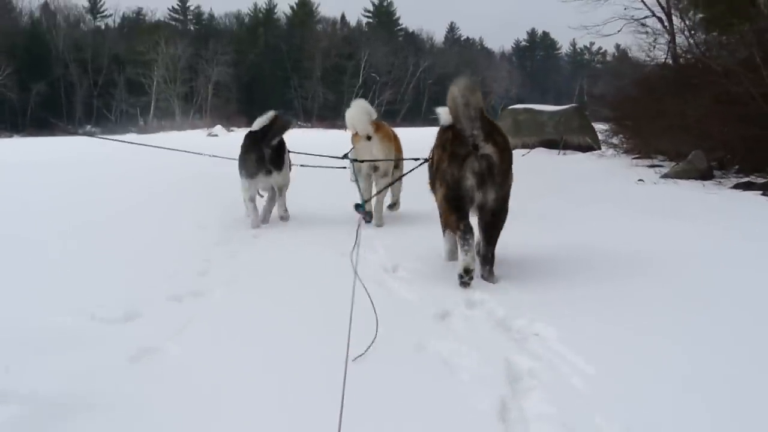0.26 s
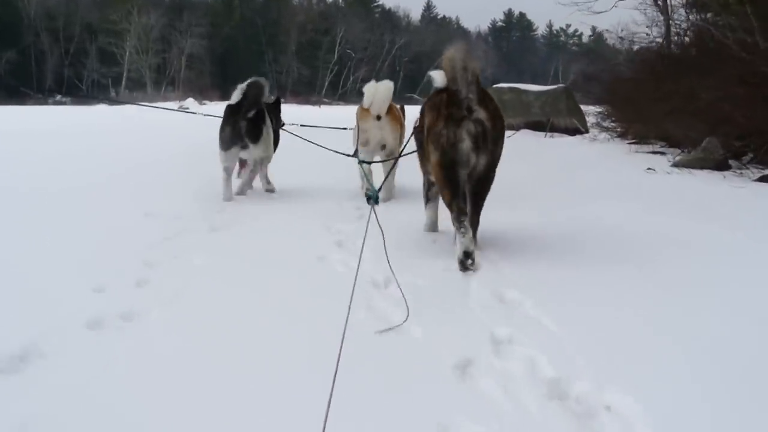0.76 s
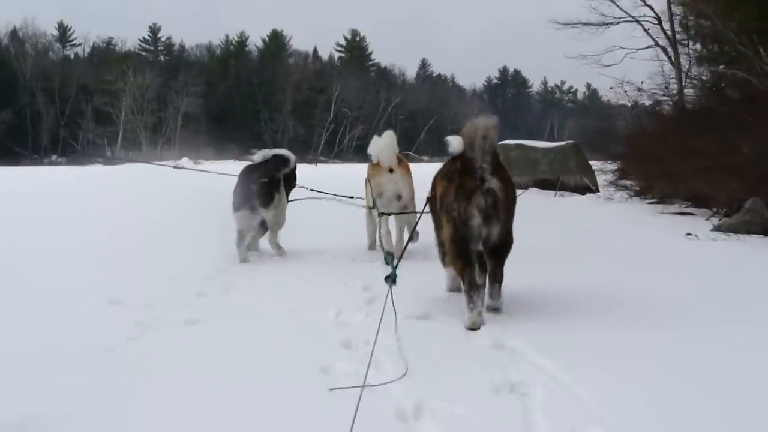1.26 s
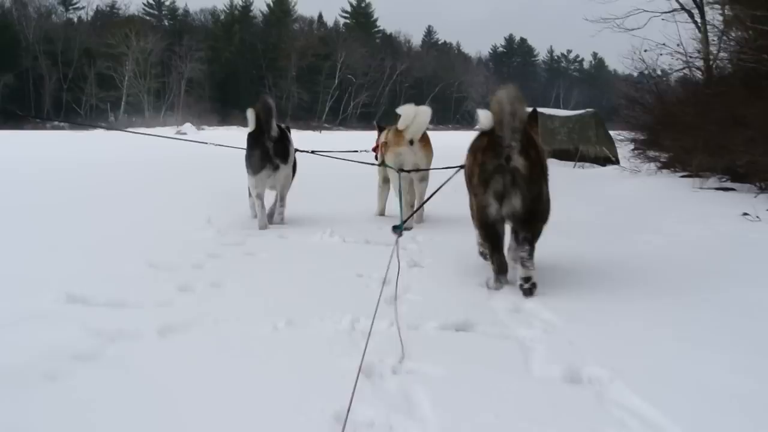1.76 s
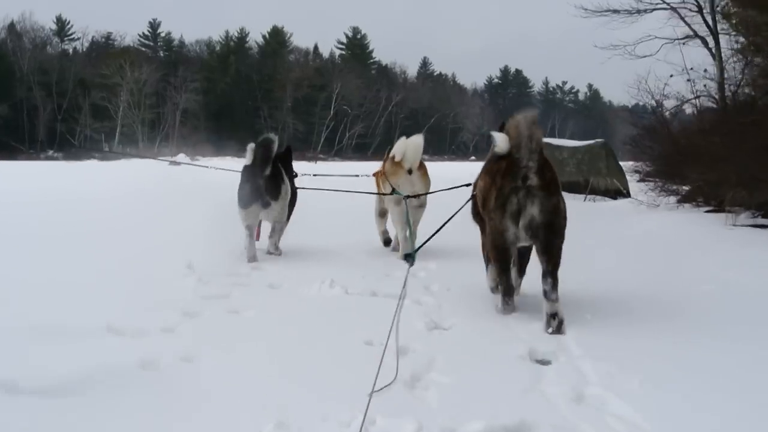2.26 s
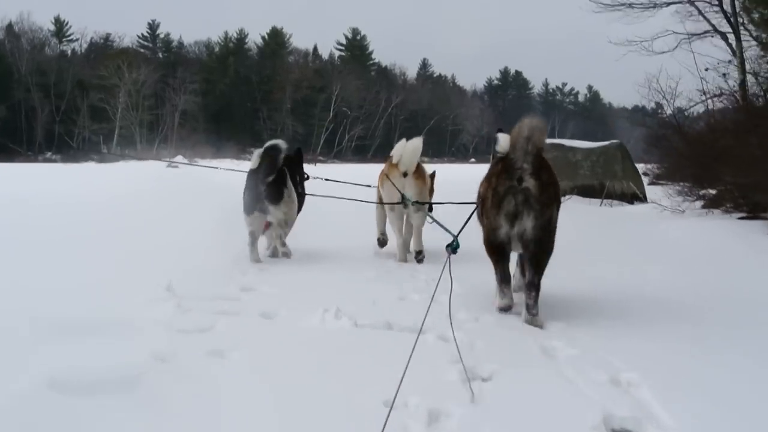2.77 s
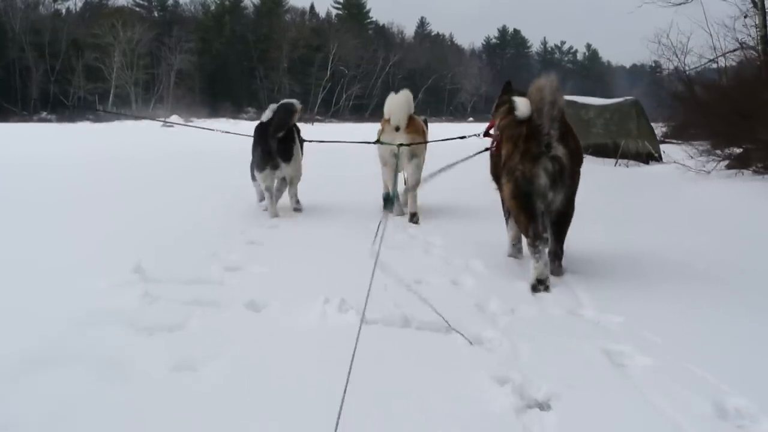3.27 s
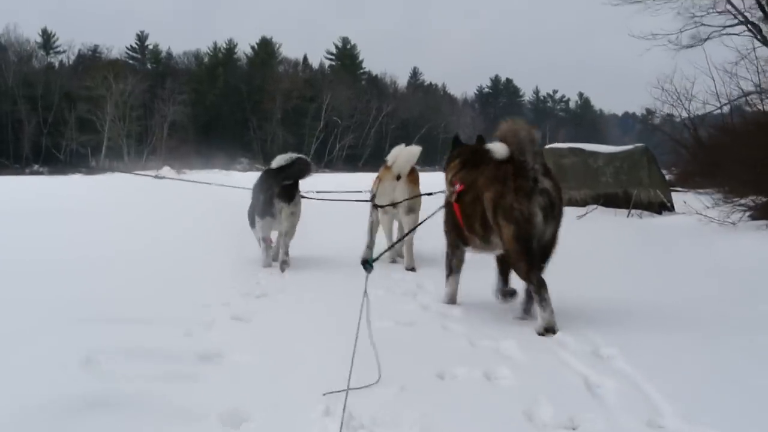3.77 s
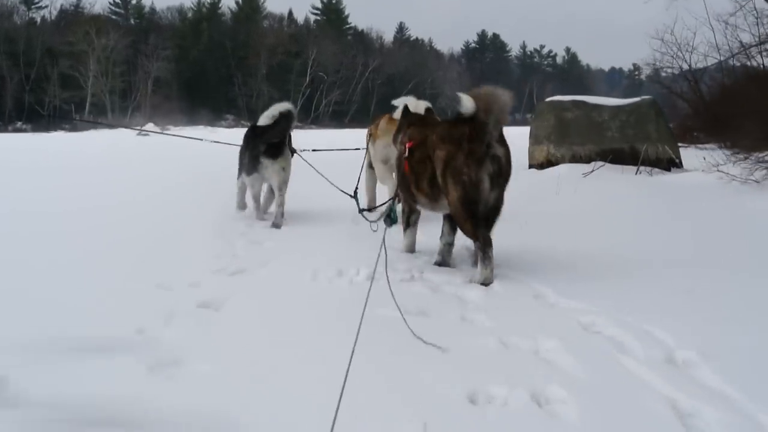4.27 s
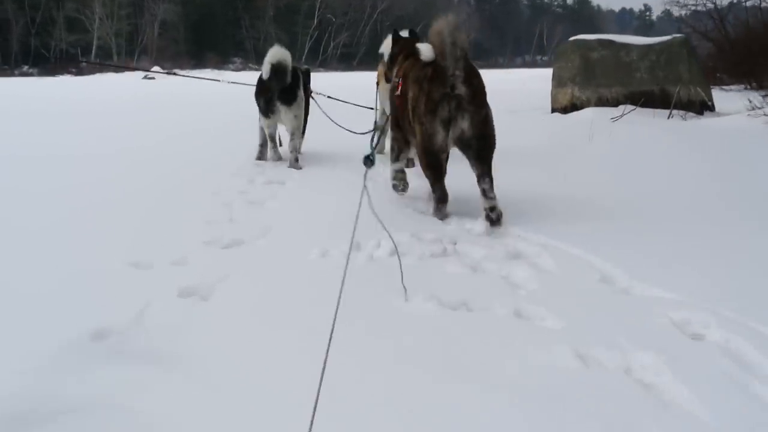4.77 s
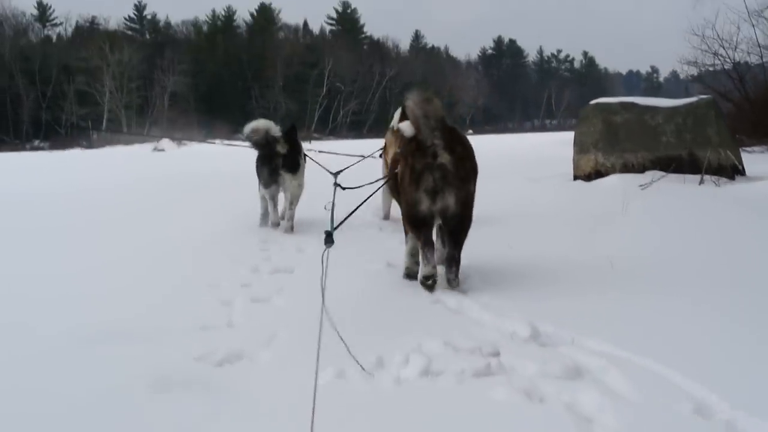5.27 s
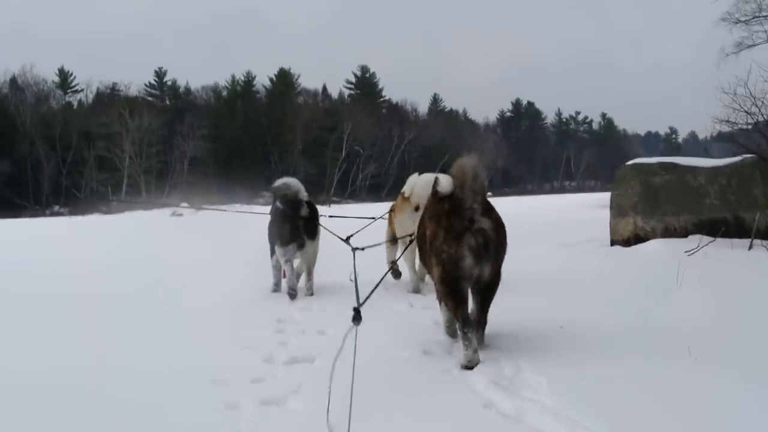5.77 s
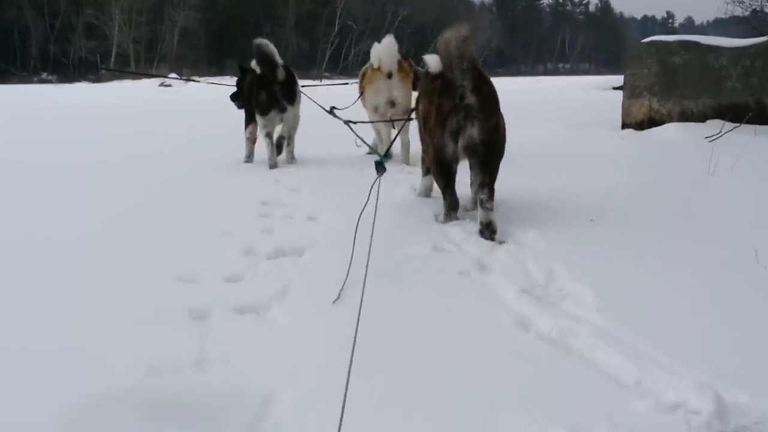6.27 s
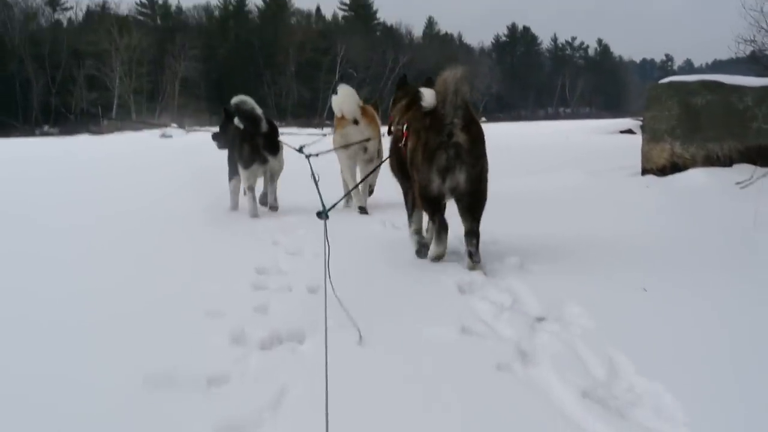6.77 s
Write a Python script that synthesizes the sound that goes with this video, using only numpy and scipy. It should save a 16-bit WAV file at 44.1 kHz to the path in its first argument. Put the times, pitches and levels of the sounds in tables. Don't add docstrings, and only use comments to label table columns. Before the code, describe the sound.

A constant, dense snow hiss fills the whole stretch, wavering slightly as the tow line tugs and slackens. The sled frame drones low underneath, its boom growing in the first second. Small woody bumps without ringing patter irregularly, sparse at first, busier and heavier in the last two seconds. The pickup is close on the sled, in stereo, in open air; the hiss is wide and the blows are central.

```python
import sys
import numpy as np
from scipy import signal
from scipy.io import wavfile
from scipy.ndimage import uniform_filter1d

SR = 44100
rng = np.random.default_rng(int(sys.argv[2]) if len(sys.argv) > 2 else 0)


def wrap_up_sound(samples):
    columns = np.atleast_2d(samples).T
    tamed = np.clip(columns, -1, 1)
    steps = np.round(tamed * 32767).astype(np.int16)
    wavfile.write(sys.argv[1], SR, steps)


def decibels_to_gain(level_db):
    exponent = np.asarray(level_db, float) / 20
    return 10 ** exponent


N = 309582

# start_s, hum_level_db
DRAG = [(0.0, -35), (0.35, -32.5), (0.53, -33.5), (1.49, -33.5), (1.58, -33), (2.01, -33), (2.73, -32),
        (3.07, -31), (3.93, -33), (4.28, -33), (4.81, -33.5), (5.04, -32.5), (5.45, -32), (6.41, -33),
        (6.74, -33.5), (7.02, -34)]


def evened(x):
    return x / np.sqrt(np.mean(abs(x) ** 2) + 1e-20)


def read_spectrum(points, hz):
    f, *columns = np.transpose(points)
    return [np.interp(np.log(hz + 1), np.log(f + 1), c)[:, None] for c in columns]


def follow(rows, t):
    s, *columns = np.transpose(rows)
    return [np.interp(t, s, c) for c in columns]


def time_and_pitch(size):
    t = np.arange(4 * N // size + 5) * size / 4 / SR
    return t, np.fft.rfftfreq(size, 1 / SR)


def noise_pair(field_db, lean_db, alike, size):
    # pitch_hz, likeness (0-1), left_lead_radians, left_over_right_db
    ports = [(60, 0.81, 0.5, -2.6), (300, 0.94, 0.1, -0.7), (1200, 0.71, -0.0, -1.2),
             (1600, 0.79, 0.1, -1.6), (2200, 0.63, 0.4, -2.1), (3000, 0.45, 0.8, -0.3),
             (3800, 0.26, 0.6, 1.0), (4600, 0.17, 0.7, 0.5), (5800, 0.12, 1.9, -0.1),
             (7600, 0.32, 3.3, 0.2), (8900, 0.2, 4.0, 1.1), (10600, 0.38, 4.6, 0.3),
             (12300, 0.22, 5.4, 1.1), (14000, 0.34, 5.2, 1.6)]
    t, hz = time_and_pitch(size)
    a, b, c, d = rng.standard_normal((len(t), len(hz), 4)).T
    same, lead, balance_db = read_spectrum(ports, hz)
    same = np.clip(same * alike, 0, 1)
    left = a + 1j * b
    own = c + 1j * d
    right = (same * left + np.sqrt(1 - same ** 2) * own) * np.exp(-1j * lead)
    tilt = decibels_to_gain((balance_db + lean_db) / 2)
    z = np.array([left * tilt, right / tilt]) * decibels_to_gain(field_db)
    return signal.istft(z, nperseg=size, noverlap=3 * size // 4)[1][:, :N]


def patches(size, frames, bins):
    t, hz = time_and_pitch(size)
    field = rng.standard_normal((len(t), len(hz))).T
    smooth = uniform_filter1d(field, bins, axis=0)
    return evened(uniform_filter1d(smooth, frames, axis=1))


def snow(t):
    # start_s, pressure_db (as hiss level), coarseness_db
    glide = [(0, -18, 0), (.32, -17.5, -1.6), (1.3, -18, -1.8), (1.95, -17, -0.5), (2.6, -18, -1),
             (3.24, -17, 0), (3.8, -17, -1), (4.4, -17.5, -0.5), (5.12, -17, 1.5), (5.42, -16.5, 1),
             (5.9, -17, 2), (6.4, -16.5, 2.6), (6.75, -17, 1.8), (7.02, -16.5, 2.5)]
    # middle_s, pressure_change_db
    tugs = [(.44, .9), (.78, .4), (.98, -.6), (1.52, -.6), (1.75, 0.4), (1.94, -.4), (2.1, 0.6),
            (2.7, -0.3), (2.92, 0.3), (3.24, 0.2), (3.36, -1), (3.61, 0.5), (3.89, -.4), (4.1, 0.5),
            (4.22, -0.3), (4.96, -2.2), (5.4, .5), (5.62, -.8), (6.16, -0.5), (6.34, -1.5), (6.9, -2)]
    tug_s = 0.069
    pressure_db, coarse_db = follow(glide, t)
    pull_db = sum(db * np.exp(-((t - s) / tug_s) ** 2) for s, db in tugs)
    return pressure_db + pull_db, coarse_db - coarse_db.mean()


def runners():
    # pitch_hz, level_db (per Hz)
    crystals = [(300, -49), (600, -13), (850, -10.5), (1160, -13.5), (1310, -11.5), (1550, -5.5),
                (4500, -4), (7000, -2), (8000, -2.5), (10300, -0.2), (12300, 0.5), (13500, -1.4),
                (14600, -4.8), (15750, -8)]
    size, boost_db = 1024, 5.35
    scraping, dulling, leaning = .55, 0.49, 0.11
    t, hz = time_and_pitch(size)
    pressure_db, coarse_db = snow(t)
    top = np.clip(np.log2(hz / 6500 + 1e-9) / 0.2, 0, 1)[:, None]
    low = np.clip(np.log2(3200 / (hz + 1)) / 0.36, 0, 1)[:, None]
    colour_db = read_spectrum(crystals, hz)[0] + coarse_db * (scraping * low - dulling * top)
    texture_db = 0.2 * patches(size, frames=15, bins=16)
    texture_db += 0.3 * patches(size, frames=5, bins=180)
    hollow = np.exp(-((hz[:, None] - 1180) / 260) ** 2)
    texture_db += 2.5 * hollow * patches(size, frames=8, bins=3)
    swing_db = pressure_db - pressure_db.mean()
    sway_db = 0.2 * patches(size, frames=20, bins=1)[0]
    lean_db = leaning * coarse_db + sway_db
    hiss = noise_pair(colour_db + texture_db + swing_db, lean_db, 1.114, size)
    return decibels_to_gain(pressure_db.mean() + boost_db) * evened(hiss)


def drone(quiet):
    # pitch_hz, level_db (per Hz)
    frame = [(15, -60), (25, -46), (114, -3), (259, -0.5), (377, -2), (557, -9.5), (786, -11), (900, -14.5),
             (1170, -25), (1980, -120)]
    size, boost_db, alike = 2048, 1.57, .9
    t, hz = time_and_pitch(size)
    drag_db = follow(DRAG, t)[0]
    rasp_db = 0.55 * snow(t)[1]
    boom_db = 4 / (1 + np.exp((0.93 - t) / 0.21))
    boom_db = boom_db - 0.2 * patches(size, frames=14, bins=1)[0]
    boom = 1 / (1 + (hz[:, None] / 170) ** 4)
    rasp = 1 / (1 + (550 / (hz[:, None] + 1)) ** 4)
    colour_db = boom * (boom_db - boom_db.mean()) + rasp * rasp_db
    field_db = read_spectrum(frame, hz)[0] + colour_db + drag_db - drag_db.mean()
    hum = evened(noise_pair(field_db, 0, alike, size))
    return hum * quiet * decibels_to_gain(drag_db.mean() + boost_db)


def ridges():
    # start_s, peak_db, pitch_hz, sharpness (0-1)
    high_ridges = [(0.1877, -18, 310, .19), (0.258, -18, 350, .12), (2.1118, -18, 290, .09),
                   (2.7889, -15, 380, .19), (3.2253, -17, 390, .07), (3.2588, -16, 350, .05),
                   (3.2776, -17, 380, .27), (3.2933, -16, 270, .14), (3.5378, -18, 320, .6),
                   (3.566, -19, 420, .27), (4.6302, -18, 320, .17), (5.1332, -17, 340, .06),
                   (5.2973, -16, 310, .34), (5.3208, -15, 370, .08), (5.3424, -14, 290, .07),
                   (5.4007, -15, 330, .38), (5.4313, -15, 310, .1), (5.4571, -14, 380, .13),
                   (5.4771, -13, 340, .21), (5.5065, -13, 400, .18), (5.5485, -18, 340, .07),
                   (5.5679, -15, 390, .05), (5.5947, -17, 260, .09), (5.8066, -15, 380, .53),
                   (6.018, -17, 320, .18), (6.1303, -14, 420, .34), (6.3299, -17, 390, .2),
                   (6.4624, -18, 350, .21), (6.5146, -16.5, 420, .7), (6.7204, -16, 310, .16)]
    # start_s, length_s, ridges_per_s, peak_db
    ruts = [(.1, .16, 30, -20), (1.341, 0.6, 16, -22), (2.3, .22, 19.3, -19.5), (2.54, .13, 38, -21.5),
            (2.729, .14, 30, -21), (2.921, .28, 47, -21), (3.461, .07, 26, -19), (3.648, .25, 25, -19.5),
            (4.029, 0.13, 46, -22), (4.36, 0.34, 27.5, -21), (4.871, .09, 44, -20.5), (5.059, .22, 38, -22),
            (5.602, 0.19, 40, -21), (5.919, .18, 26, -20), (6.24, .04, 96, -21), (6.52, .47, 29.4, -20.5)]
    pitch_hz, pitch_spread_hz, spread_db = 330, 160, 2.5
    uneven, clear_s = .7, .008
    rows = list(high_ridges)
    for start, length, per_s, db in ruts:
        late, size, pitch, tip = rng.random((40, 4)).T
        s = start + (np.arange(40) + uneven * late) / per_s
        free = abs(s[:, None] - np.transpose(high_ridges)[0]).min(axis=1) > clear_s
        peak_db = db + spread_db * (size - .5)
        hz = pitch_hz + pitch_spread_hz * (pitch - .5)
        low = np.transpose([s, peak_db, hz, .45 * tip ** 2])
        rows += list(low[free & (s < start + length)])
    return rows


def calm(rows):
    depth, width_s = .6, .012
    marks = np.zeros(N)
    marks[[round(s * SR) for s, *_ in rows]] = 1
    dips = signal.oaconvolve(marks, np.hanning(round(width_s * SR)), "same")
    return 1 - depth * np.minimum(dips, 1)


def knock(hz, tip=0.29):
    lift, rebound = 0.28, 0.69
    u = np.arange(-440, 441) / SR * hz
    skew = np.where(u < 0, lift, rebound)
    body = np.cos(2 * np.pi * u) * np.exp(np.log(np.clip(skew, .05, .9)) * (2 * u) ** 2)
    point = np.cos(2 * np.pi * 2.0 * u) * np.exp(-(1.07 * u) ** 2)
    return -(1 - tip / 2) * body - .8 * tip * point


def knocks(rows):
    boost_db = 1.8
    out = np.zeros(N + 1000)
    for s, db, hz, tip in rows:
        at = round(s * SR)
        out[at:at + 881] += decibels_to_gain(db + boost_db) * knock(hz, tip)
    return out[440:][:N]


def chatter(quiet):
    per_s, boost_db = 150, -5.5
    hit, size, kind = rng.random((N, 3)).T
    train = (hit < per_s / SR) * size * quiet
    kind = (kind * 4).astype(int)
    out = np.zeros(N)
    for k, hz in enumerate((229, 297, 366, 440)):
        out += signal.oaconvolve(train * (kind == k), knock(hz), "same")
    drag_db = follow(DRAG, np.arange(N) / SR)[0]
    return evened(out) * decibels_to_gain(drag_db + boost_db)


def scene():
    rows = ridges()
    quiet = calm(rows)
    no_rumble = signal.butter(2, 80, "high", fs=SR)
    blows = signal.filtfilt(*no_rumble, knocks(rows) + chatter(quiet))
    return runners() + drone(quiet) + blows * decibels_to_gain([[-.4], [.4]])


def roll_off(x):
    return signal.sosfilt(signal.butter(12, 15745, fs=SR, output="sos"), x)


def record(dry):
    return roll_off(np.clip(dry, -1, 1))


dry = scene()
out = record(dry)
wrap_up_sound(out)
```